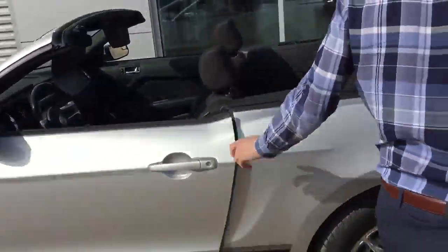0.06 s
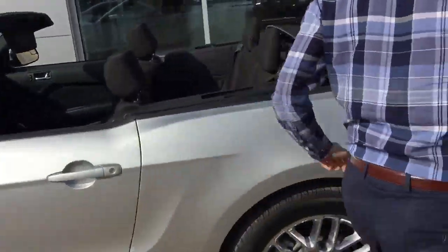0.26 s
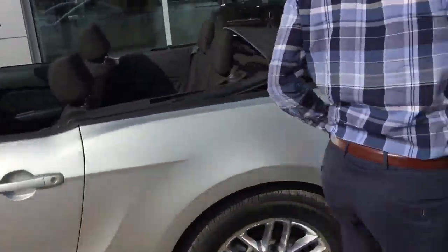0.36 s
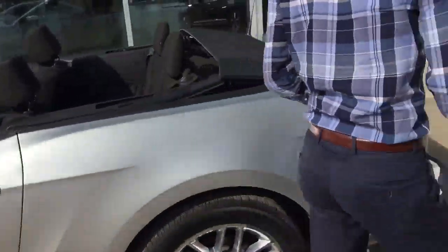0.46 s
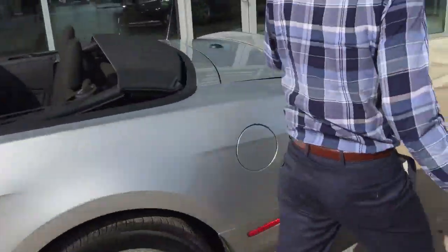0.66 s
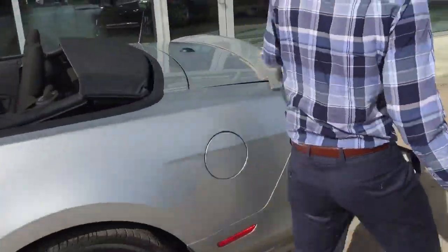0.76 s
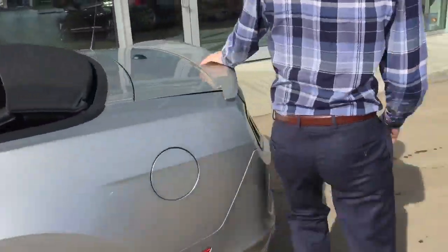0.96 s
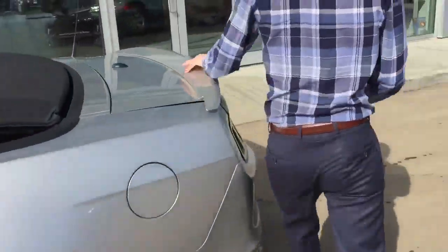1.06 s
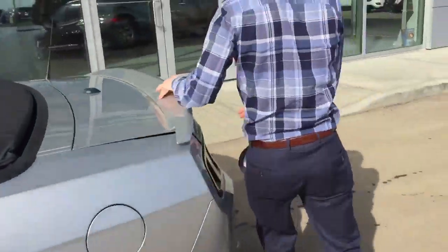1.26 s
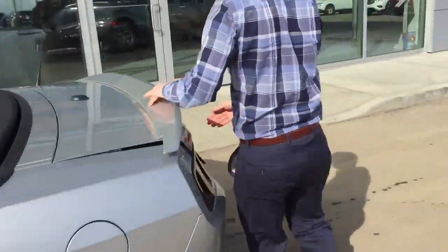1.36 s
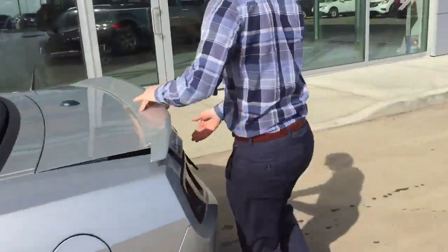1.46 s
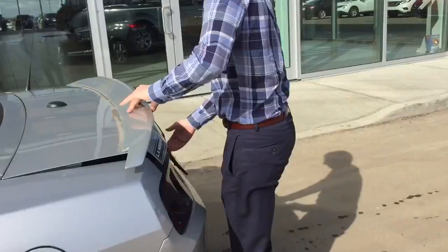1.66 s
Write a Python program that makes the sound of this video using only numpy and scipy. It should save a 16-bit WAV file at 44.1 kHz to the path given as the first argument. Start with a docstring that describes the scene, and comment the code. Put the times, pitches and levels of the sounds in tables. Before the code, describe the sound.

A car door shuts with a loud, close thud outdoors, followed by faint clicks.

```python
"""Shutting a car door

A car door is pushed shut close by, on an open lot in front of a glass building. The latch hits
the striker (the metal loop that holds it), the door lands on its rubber seals and booms, and lock
and window chatter briefly. The shut door settles with dull after-knocks. Soft low bumps of steps
and handling and a few small clicks are heard too, over distant traffic and light wind."""
import sys
import numpy as np
from scipy import signal
from scipy.fft import irfft
from scipy.io import wavfile

SR = 44100
rng = np.random.default_rng(int(sys.argv[2]) if len(sys.argv) > 2 else 0)


def put_to_file(sound):
    """Save the sound as 16-bit audio at rate SR, in the file named by the first command-line argument."""
    columns = np.atleast_2d(sound).T  # one column per channel
    safe = np.clip(columns, -1, 1)
    whole_steps = np.round(safe * 32767)
    wavfile.write(sys.argv[1], SR, whole_steps.astype(np.int16))


N = 74970  # 1.7 seconds

# The tone colour of each noise. Each row: frequency in Hz, relative strength there in dB.
TRAFFIC_COLOUR = [(100, 9.5), (300, 3.5), (500, -3.5), (1050, 3), (1700, -6.5), (2500, -11), (3800, -24),
                  (6000, -28), (8000, -36), (11000, -38.5), (17000, -40)]
WIND_COLOUR = [(25, -22.5), (50, 6), (80, 5.5), (130, -2), (220, -9), (400, -28), (900, -48)]
SCRAPE_COLOUR = [(600, 6), (1200, -0.5), (2500, 9), (4200, 4.5), (6500, -7), (10000, -13), (17000, -36)]
SCUFF_COLOUR = [(40, -47), (80, 12), (200, -7), (350, 4), (600, -4), (900, -18), (3000, -53)]
TICK_COLOUR = [(800, -24), (2500, -10), (4500, 1), (9000, -0.5), (12000, -9.5), (17000, -14)]
BOOM_COLOUR = [(45, -20), (85, 3), (140, -6.5), (220, 1), (350, 4), (440, -11.5), (560, -17.5), (900, -36)]
CLANG_COLOUR = [(130, -18), (270, -2), (450, -6), (760, 2.5), (980, 0), (1350, -6.5), (1750, -15.5),
                (2300, -11.5), (3500, -33), (8000, -47)]
CRACK_COLOUR = [(600, -10), (1500, 6), (2300, -0.5), (3500, 1), (5500, -8), (8000, -25), (17000, -33)]
SNAP_COLOUR = [(2500, -1), (5000, 1), (7500, 1), (10400, -7), (11500, -6), (17000, -9)]

# How traffic and wind rise and fall. Each row: time in seconds, level in dB.
TRAFFIC_SWELL = [(0, -43.5), (.5, -44), (.8, -41.5), (1.05, -40.5), (1.35, -41.5), (1.55, -43.5),
                 (1.7, -43)]
WIND_SWELL = [(0, -45), (.05, -40), (.1, -51), (.4, -33.5), (.75, -32), (.9, -45), (1.15, -40), (1.25, -56),
              (1.42, -38), (1.7, -30)]
# Echoes from the lot. Each row: lowest and highest frequency in Hz, level in dB, fade time in seconds.
# A fade time (t60) is how long a sound takes to drop by 60 dB.
LOT_ECHOES = [(410, 2380, -11.5, 0.13), (1580, 4300, -13.5, 0.24), (3800, 11700, -11.5, 0.15),
              (10000, 13000, -17, .14)]
# Rubs of soles and clothing. Each row: start in seconds, level in dB, fade time in seconds.
RUBS = [(0.042, -53.5, 0.8), (0.212, -37.5, 0.051), (.455, -44, 0.072), (0.633, -48, 0.053),
        (1.281, -42, 0.063), (1.298, -46.5, 0.043), (1.364, -39, 0.053), (1.432, -47.5, 0.06)]
# Soft low bumps: dull after-knocks as the shut door settles (0.366 to 0.413 s), plus steps and
# handling. Each row: start in seconds, relative level in dB, starting pitch in Hz,
# fade time in seconds, scuff level in dB.
SOFT_BUMPS = [(0.123, -29, 150, 0.1, -39.5), (0.141, -34, 410, 0.043, -32),
              (0.159, -15.5, 225.7, 0.04, -30.5), (0.18, -24.5, 168, 0.11, -54.5),
              (0.198, -13, 199, 0.036, -36), (0.366, -26.5, 418, 0.051, -25),
              (0.381, -15, 342, 0.028, -43.5), (0.413, -24.5, 202, 0.14, -33),
              (0.511, -10.5, 168, 0.033, -32.5), (0.529, -11.5, 150, 0.024, -51),
              (0.545, -16, 143, 0.075, -51.5), (0.556, -29.5, 130, 0.033, -51),
              (0.619, -24, 168, 0.024, -45), (.630, -18, 290, 0.032, -43), (.638, -19.5, 528, 0.019, -25),
              (0.647, -17.5, 215, 0.029, -60), (0.694, -27, 170, 0.18, -45), (0.751, -25, 218, 0.081, -40),
              (0.966, -34.5, 200, 0.107, -43), (1.042, -21.5, 270, 0.038, -57),
              (1.149, -24, 250, 0.032, -42), (1.189, -29.5, 167.4, 0.051, -39),
              (1.311, -32.5, 109.2, 0.09, -36.5), (1.457, -17.5, 622, 0.013, -31.5),
              (1.465, -9, 285, 0.087, -22.5), (1.504, -21, 195, 0.14, -28.5), (1.567, -14, 198, 0.016, -33),
              (1.595, -27.5, 113, 0.089, -40), (1.62, -21.5, 243, 0.02, -38.5),
              (1.690, -32, 276, 0.028, -23)]
# Small hard clicks. Each row: start in seconds, ring level in dB, tick level in dB,
# size of the part as a ratio (bigger rings lower).
SMALL_CLICKS = [(1.2396, -22.5, -18, 1), (1.2406, -15, -41, 1.035), (1.2471, -24, -27, 0.91),
                (1.2562, -27, -34, 0.92), (1.2598, -33, -26.5, 0.7), (1.267, -36, -35, 1.3),
                (1.306, -37.5, -48, 0.965), (1.4414, -34.5, -64, 1.6), (1.448, -29, -60, 1.8)]
# The door lands on its seals and rocks. Each row: start in seconds, relative level in dB.
DOOR_PUSHES = [(.246, 2), (.2634, -4), (.2817, .5)]
# Metal hits of latch, frame and window. Each row: start in seconds, then clang, crack and snap in dB.
METAL_HITS = [(.2265, -17, -41, -62), (0.2309, -29, -22, -46), (.2360, -11, -22, -32.5),
              (0.238, -9, -28, -28.5), (0.2421, -9.5, -22.5, -25.5), (0.2456, -6.5, -14, -27.5),
              (0.258, -24, -26, -38), (0.2625, -16, -22, -26.5), (.269, -10, -19.5, -24),
              (0.2739, -13.5, -38, -30.5), (.279, -12.5, -24, -22.5), (0.2838, -13, -21, -29.5),
              (0.294, -23, -37, -42), (0.3071, -21.5, -29.5, -35.5), (0.329, -16, -24, -50),
              (0.3403, -21, -34.5, -51), (.384, -48.5, -48, -54)]
# Tones the lock parts boost. Each row: frequency in Hz, width in Hz, level of the added band in dB.
LOCK_RESONANCES = [(2200, 310, -5.5), (2740, 51, -11), (3330, 47, -20), (4500, 42, -2), (5370, 26, -3),
                   (5940, 80, 3), (7960, 58, -8), (8770, 74, 0)]

# The tones of each struck part. Each row: pitch in Hz, relative level in dB, fade time in seconds.
CLICK_TONES = [(418, -13.5, 0.12), (543, -13.5, 0.047), (1140, -12.5, 0.012), (2250, -14.5, 0.0091),
               (3029, -6, 0.0075), (3900, 1, 0.0053), (4780, -17.5, 0.0131), (5930, -14, 0.011),
               (9130, -27, 0.013)]
CATCH_TONES = [(1260, -9, .05), (2590, -8.5, .012), (3560, -4.5, 0.0088), (3790, -5.5, 0.0063),
               (6900, -13, .006), (8400, -30.5, .045), (8700, -12, .003)]
BODY_TONES = [(48.5, -18.5, .4), (68, -22.5, .6), (86.5, -11, .44), (118.3, -19, .49), (149, -8, .29),
              (173, -24, .45), (204, -10.5, .44), (222, -23, .36), (259.5, -17, .3), (297, -14.5, .4),
              (319, -13.5, .36)]  # door skin and cabin
STRIKER_TONES = [(685, -16.5, 0.035), (852, -9.5, 0.03), (1220, -15.5, 0.04), (2020, -25, 0.055),
                 (3850, -41, 0.041)]
FRAME_TONES = [(508, -23, .33), (608, -19, .31), (643, -20, .28), (733, -14, .25), (805, -23, .22),
               (880, -23, .25), (942, -19, .38), (968, -20, .33), (1143, -25, .28), (1286, -23, .26),
               (1540, -30, .25), (1942, -29, .22), (2380, -29, .22), (3410, -39, .2)]  # steel door frame

LANDING_S = .238  # the frame starts to ring and the car to boom


def undb(db):
    """Turn decibels into a number to multiply a sound by."""
    return 10 ** (np.asarray(db) / 20)


def since(start):
    """Seconds since a moment, zero before it."""
    return np.maximum(np.arange(N) / SR - start, 0)


def fade(start, t60, attack_s=0.00027):
    """A loudness shape that rises quickly, then dies away."""
    age = since(start)
    return (1 - np.exp(-age / attack_s)) * np.exp(-np.log(1000) * age / t60)


def noise(colour):
    """Steady noise of standard strength with the given tone colour."""
    hz, db = np.array(colour, float).T
    freqs = np.maximum(np.arange(N // 2 + 1) * SR / N, 1)
    gain = undb(np.interp(np.log(freqs), np.log(hz), db))
    edges = np.minimum(freqs / hz[0], 1) ** 2 * np.minimum(hz[-1] / freqs, 1) ** 2
    phases = np.exp(2j * np.pi * rng.random(len(freqs)))
    x = irfft(gain * edges * phases, N)
    return x / x.std()


def ring(tones, start):
    """A struck part rings with several tones, each fading at its own speed."""
    age = since(start)
    return sum(undb(db) * fade(start, t60) * np.sin(2 * np.pi * hz * age) for hz, db, t60 in tones)


def convolve(x, response):
    """Let every sample of a sound set off its own copy of a ring or echo."""
    return signal.fftconvolve(x, response)[:N]


def traffic_and_wind():
    """Distant traffic swells gently over a low rumble of wind."""
    def level(swell):
        times, db = np.array(swell).T
        return undb(np.interp(since(0), times, db))
    return noise(TRAFFIC_COLOUR) * level(TRAFFIC_SWELL) + noise(WIND_COLOUR) * level(WIND_SWELL)


def lot_echoes(x, delay_s=0.0092):
    """Sound scatters briefly off the ground, the cars and the building."""
    response = 0
    for low_hz, high_hz, db, t60 in LOT_ECHOES:
        tail = rng.standard_normal(N) * fade(delay_s, t60)
        band = signal.butter(2, [low_hz, high_hz], "bandpass", fs=SR, output="sos")
        response += undb(db) * signal.sosfilt(band, tail / np.linalg.norm(tail))
    return convolve(x, response)


def scrapes():
    """Soles and cloth rub, making short, soft puffs of noise."""
    return sum(undb(db) * noise(SCRAPE_COLOUR) * fade(start, t60, attack_s=0.0046)
               for start, db, t60 in RUBS)


def bumps(rest_hz=62.7, sag_s=0.008, attack_s=0.0019):
    """Dull knocks of the settling door, steps and handling: each sags in pitch and has a soft scuff."""
    out = 0
    for start, db, hz, t60, scuff_db in SOFT_BUMPS:
        age = since(start)
        cycles = rest_hz * age + (hz - rest_hz) * sag_s * (1 - np.exp(-age / sag_s))
        out += 2 * undb(db) * fade(start, t60, attack_s) * np.sin(2 * np.pi * cycles)
        out += undb(scuff_db) * noise(SCUFF_COLOUR) * fade(start, t60=0.11, attack_s=attack_s)
    return out


def clicks():
    """A small hard part ticks, rings for an instant and leaves a faint tail."""
    out = 0
    for start, ring_db, tick_db, size in SMALL_CLICKS:
        tones = [(hz / size, db, t60) for hz, db, t60 in CLICK_TONES]
        tick = fade(start, t60=0.0025, attack_s=.00005)
        tail = undb(-30.5) * fade(start, t60=0.079)
        out += undb(ring_db) * ring(tones, start)
        out += undb(tick_db) * (tick + tail) * noise(TICK_COLOUR)
    return out


def spring_catch():
    """A spring catch drops in: a duller click with a thin, lingering ring."""
    return undb(-22) * ring(CATCH_TONES, start=1.3645)


def striker(rebound_s=.3305):
    """The striker rings at the first hit, then more softly as the latch knocks back against it."""
    first_hit_s = METAL_HITS[0][0]
    return ring(STRIKER_TONES, first_hit_s) + undb(-9.5) * ring(STRIKER_TONES, rebound_s)


def lock(x):
    """The small steel parts of the lock boost the same tones in every hit."""
    return x + sum(undb(db) * signal.lfilter(*signal.iirpeak(hz, hz / width, SR), x)
                   for hz, width, db in LOCK_RESONANCES)


def latch(frame_attack_s=.008):
    """Each metal hit clangs, cracks and snaps; the door frame rings on."""
    build_up = 1 - np.exp(-since(LANDING_S) / frame_attack_s)
    out = undb(2.5) * ring(FRAME_TONES, LANDING_S) * build_up
    attack_s = 0.00043
    for start, clang_db, crack_db, snap_db in METAL_HITS:
        out += undb(clang_db) * noise(CLANG_COLOUR) * fade(start, t60=0.053, attack_s=attack_s)
        out += undb(crack_db) * noise(CRACK_COLOUR) * fade(start, t60=0.035, attack_s=attack_s)
        out += undb(snap_db) * noise(SNAP_COLOUR) * fade(start, t60=0.043, attack_s=attack_s)
    return out


def thud(push_s=.002):
    """Cushioned pushes ring the door skin and cabin; the rest of the car booms along."""
    force = 0
    for start, db in DOOR_PUSHES:
        push = np.sin(np.pi * np.minimum(since(start) / push_s, 1))  # one smooth hump
        force += undb(db) * push / push.sum()
    body = undb(0.4) * convolve(force, ring(BODY_TONES, 0))
    boom = undb(-16) * noise(BOOM_COLOUR) * fade(LANDING_S, t60=0.42, attack_s=0.0054)
    return body + boom


def seal(start=.2478, hz=133):
    """The rubber seal is squeezed: one short, heavy thump."""
    return undb(11) * fade(start, t60=0.048, attack_s=0.0078) * np.sin(2 * np.pi * hz * since(start))


def scene():
    """Mix the door, echoes, small noises and background into one channel."""
    door = striker() + lock(latch()) + thud() + seal()
    small_parts = clicks() + spring_catch()
    echoes = lot_echoes(door + undb(-2.5) * small_parts)
    return (door + small_parts + echoes + bumps() + scrapes() + traffic_and_wind())[None]


def record(dry):
    """Drop the deepest bass, round off the loudest peaks and cut the highest treble."""
    low_hz, top_hz = 31, 17300
    bass_cut = signal.butter(6, low_hz, "highpass", fs=SR, output="sos")
    treble_cut = signal.ellip(10, .2, 80, top_hz, fs=SR, output="sos")
    x = signal.sosfilt(bass_cut, dry)
    rounded = x / (1 + x ** 6) ** (1 / 6)
    return signal.sosfilt(treble_cut, rounded)


dry = scene()
out = record(dry)
put_to_file(out)
```